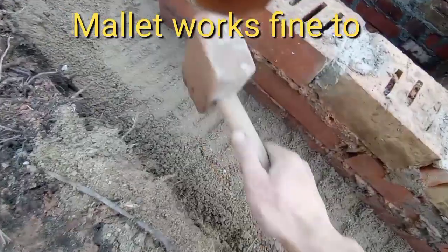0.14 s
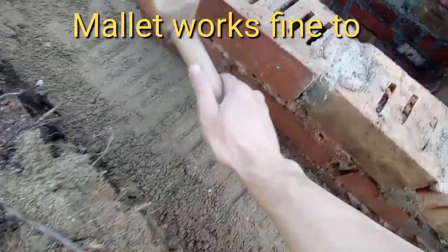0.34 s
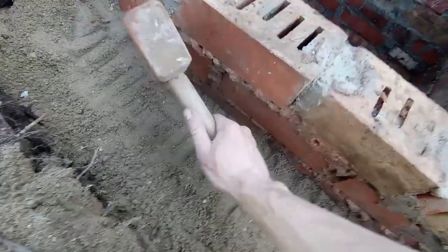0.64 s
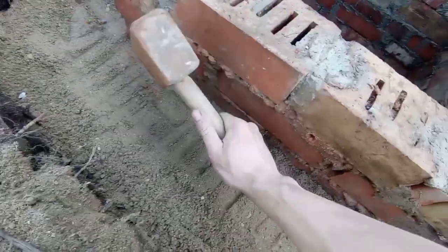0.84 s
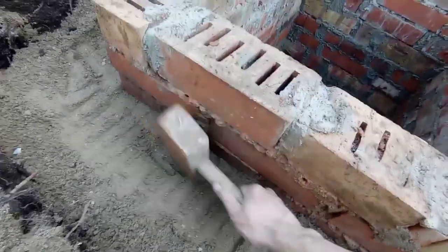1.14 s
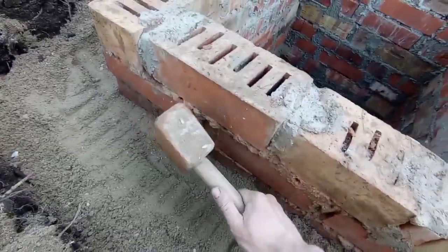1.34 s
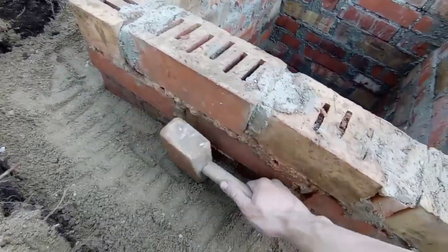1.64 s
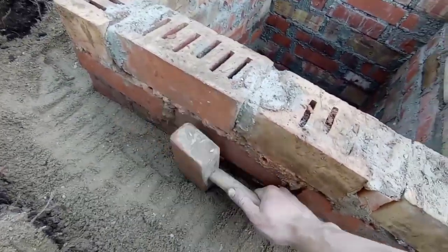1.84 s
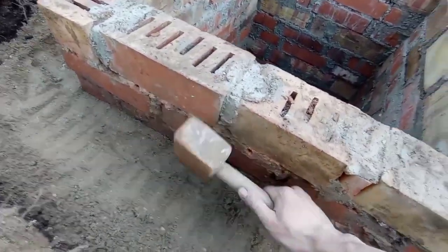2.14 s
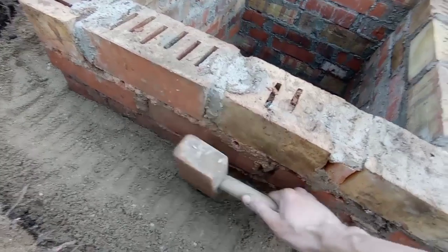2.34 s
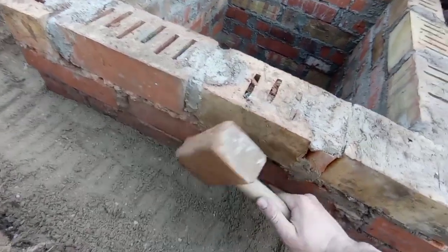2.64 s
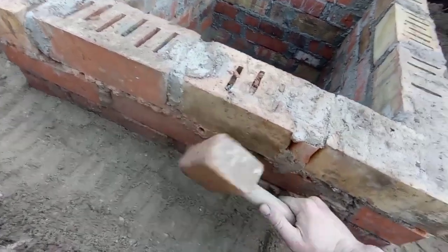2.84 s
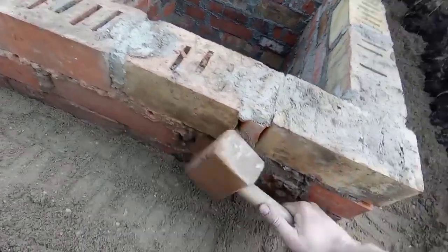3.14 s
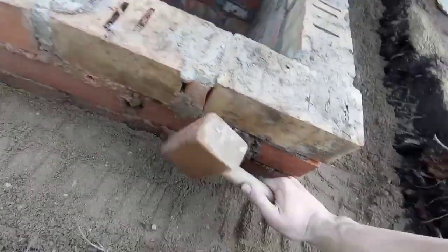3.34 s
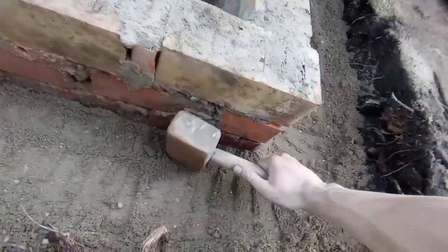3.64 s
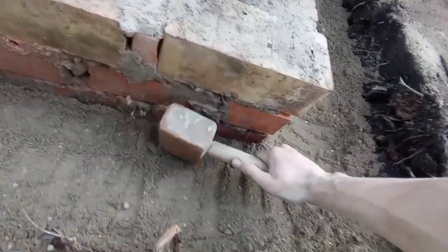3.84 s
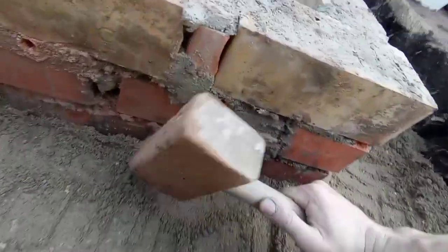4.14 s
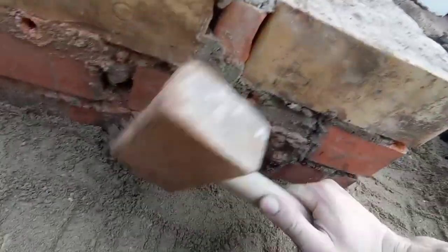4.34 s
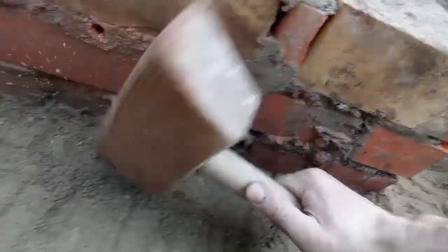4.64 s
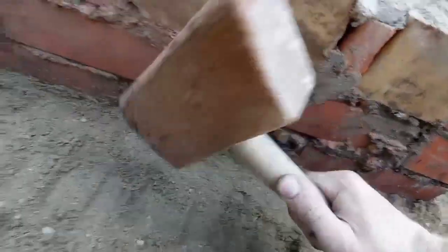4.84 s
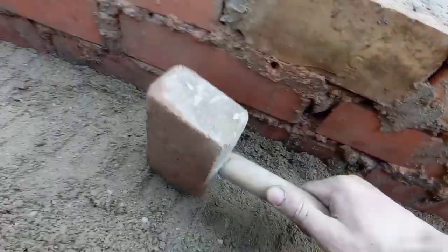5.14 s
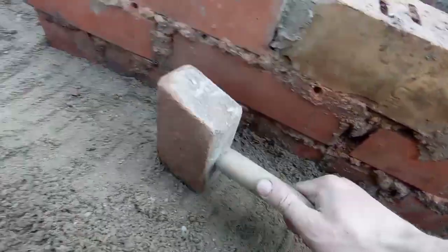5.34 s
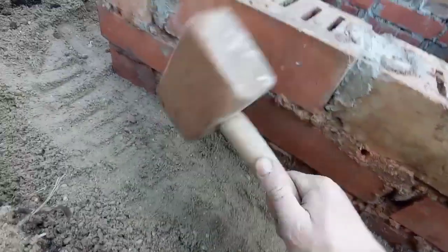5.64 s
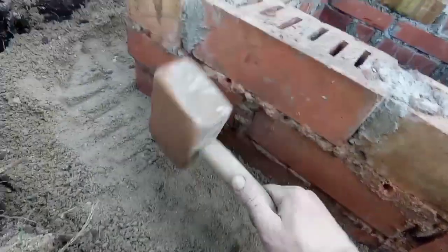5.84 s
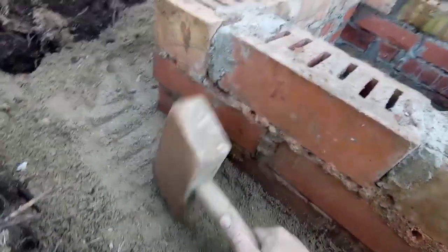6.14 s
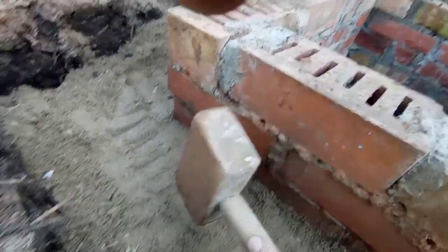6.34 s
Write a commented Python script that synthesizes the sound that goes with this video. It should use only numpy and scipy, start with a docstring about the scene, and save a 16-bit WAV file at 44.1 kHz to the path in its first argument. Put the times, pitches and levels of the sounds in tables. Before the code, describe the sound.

Close, dry recording outdoors beside low brickwork: a mallet rapidly tamps packed sand, thudding and slapping evenly. Sand patters between blows and hard little knocks come off brick. Halfway the hits fade to light taps and gritty scraping, then dull thuds rebuild and end crisp and strong. Faint buzzy bird whistles sit far behind, over low air noise.

```python
"""At the foot of a brick wall, outdoors: a mallet close to the microphone tamps damp sand, four to five blows
a second. Each blow is a crunch of noisy grains, a slap pulse, a ringing clack and a sinking thud; brief
knocks and ticks fall between. Shaped grain noise makes the falling sand, the scrapes and the cloth. Short
echoes come off the walls; far away, swept tones call as small birds over a bed of quiet air noise."""
import sys
import numpy as np
from scipy import signal
from scipy.fft import rfft, irfft, next_fast_len
from scipy.io import wavfile
from scipy.ndimage import map_coordinates

SR = 44100
rng = np.random.default_rng(int(sys.argv[2]) if len(sys.argv) > 2 else 0)


def generate_wav(signal):
    """Clip the signal to [-1, 1] and save it as 16-bit WAV at the path in sys.argv[1]."""
    frames = np.transpose(np.atleast_2d(signal))
    scaled = np.clip(frames, -1, 1) * 32767
    pcm = np.round(scaled).astype(np.int16)
    wavfile.write(sys.argv[1], SR, pcm)


N = 286031
TIME = np.arange(N) / SR

# Levels in the tables are relative within their own column or layer.
# Blows on the sand, close by: (time [s], thud level [dB], settled thud pitch [Hz], slap level [dB],
# clack level [dB], crunch level [dB])
BLOWS = [(0.690, -8, 144.7, -10.5, -45, -32.5), (0.920, -1.5, 146, -7, -18, -29.5),
         (1.1442, -10, 127.5, -13.5, -37, -29), (1.3769, -10.5, 126, -14.5, -19, -29.5),
         (1.604, -10, 134.2, -8, -14.5, -27), (1.8223, -12.5, 131, -15.5, -58, -26),
         (2.053, -13, 129, -13.5, -26, -26), (2.279, -13, 122.5, -18, -33.5, -29),
         (2.5064, -8.7, 136.3, -15, -27.5, -28.5), (2.7203, -11, 130, -13.5, -27.5, -29),
         (2.941, -5, 142.8, -17.5, -30.5, -28.5), (3.17, -16, 123, -26, -49.5, -32.5),
         (3.403, -28, 120, -54, -42, -31), (3.6076, -27.5, 133, -38, -18, -41.5),
         (3.826, -24, 120, -30.5, -55.5, -35.5), (4.033, -16, 143.6, -61, -42, -41.5),
         (4.233, -20, 126, -30, -56, -34.5), (4.4564, -14, 128, -17.5, -33.5, -31.5),
         (4.675, -7.5, 142, -25.5, -53, -33.5), (4.8926, -7.3, 138.3, -29, -37, -30.5),
         (5.116, -10.5, 133.6, -45, -45, -35), (5.33, -8.5, 137.5, -22.5, -26.5, -30),
         (5.547, -14.5, 130, -47, -35, -35.5), (5.7624, -6.5, 146, -28.5, -31.5, -33),
         (5.988, -8.5, 132.5, -31, -20, -32.5), (6.195, -3.5, 152.4, -7.5, -24.5, -28),
         (6.39, -4.5, 147.7, -13.5, -12, -31.5)]
# Firmly packed sand thuds higher and shorter than loose sand: (thud pitch [Hz], decay by 60 dB [s])
PACKING = [(127, 0.061), (148, .027)]
# Ringing modes of the mallet head: (frequency [Hz], level [dB], decay by 60 dB [s])
HEAD_MODES = [(520, -2, .015), (660, -2, .015), (1450, -13, .01)]
# Brief knocks and ticks: brick contacts, light taps just before a blow, small handling ticks:
# (time [s], knock level [dB], tick level [dB])
KNOCKS = [(0.071, -38, -58), (0.307, -37, -75), (0.572, -64.5, -52), (1.796, -47.5, -78),
          (2.463, -49, -41.5), (2.476, -32, -25), (2.489, -37, -32), (2.501, -15.5, -21.5),
          (2.716, -27.5, -23), (3.036, -70, -49.5), (3.045, -41, -67), (3.375, -51.5, -43.5),
          (3.382, -35.5, -22.5), (3.604, -22, -27), (3.685, -67, -42), (3.817, -37.5, -33.5),
          (3.922, -77.5, -49), (4.027, -34, -31), (6.143, -39.5, -58)]
# Resonances of the mortared bricks: (frequency [Hz], width [Hz], level [dB])
BRICK_MODES = [(391, 91, 5), (664, 190, 4), (758, 210, 3), (1084, 310, -4.5), (1248, 390, -7.5),
               (2400, 700, -20)]
# Sand drops from the lifted head between blows: (time [s], level [dB])
SPILLS = [(1.729, -39), (2.181, -55.5), (2.393, -34), (2.628, -37.5), (2.840, -39), (3.067, -33.5),
          (3.292, -32), (3.53, -38), (3.74, -35.5), (6.144, -49)]
# Sand scraping underfoot and under the head: (time of the height [s], rise [s], fall [s],
# hiss level [dB], dull rub level [dB])
SCRAPES = [(0.11, 0.097, 0.19, -66.5, -66), (0.565, 0.089, .07, -66.5, -88), (0.899, .01, 0.012, -65, -80),
           (1.15, 0.052, .058, -59.5, -72), (3.64, 0.23, 0.19, -65, -66), (3.98, 0.027, 0.027, -40, -50),
           (4.077, 0.039, 0.031, -41, -48.5), (4.161, 0.03, 0.069, -33, -44.5),
           (4.388, 0.055, 0.039, -47.5, -52.5), (4.54, 0.12, 0.11, -65, -65.5),
           (4.733, 0.051, 0.062, -67, -46), (4.952, 0.059, 0.049, -72, -59), (6.229, .06, 0.08, -53.5, -56),
           (6.33, 0.054, .053, -36, -53.5), (6.455, .036, .036, -42, -60.5)]
# Clothing as the arm lifts, level curve: (time [s], level [dB])
RUSTLE = [(0.043, -94), (0.076, -50.5), (0.11, -60.5), (0.2, -63), (0.3, -64.5), (0.45, -72.5)]
# Colour of crushed, falling and ticking grains: (frequency [Hz], relative density [dB per Hz])
GRIT_COLOUR = [(300, 7.5), (900, -2.5), (2000, -2), (3500, -3), (5500, -3.5), (7200, 2), (8500, -11),
               (11000, -17.5), (13700, -24.5), (15200, -9), (16500, -38.5)]
# Colour of loose grains hissing as they slide: (frequency [Hz], relative density [dB per Hz])
HISS_COLOUR = [(200, -17), (700, -25), (1500, -5), (3000, -3), (4200, -1.5), (5600, 2.5), (7200, 0.5),
               (8500, -11), (11000, -20), (13500, -24.5), (15100, -13), (16200, -15.5)]
# Colour of packed sand rubbing: (frequency [Hz], relative density [dB per Hz])
RUB_COLOUR = [(120, -7.5), (300, 1.5), (600, 3.5), (1200, 0.5), (2600, -6.5), (4000, -11.5), (8000, -22),
              (16000, -39)]
# Colour of the cloth: (frequency [Hz], relative density [dB per Hz])
CLOTH_COLOUR = [(300, 2), (1500, -8), (2200, 6.5), (3600, 7.5), (4800, -4), (9000, -7.5), (12000, -33)]
# Echo of the yard: (frequency [Hz], decay by 60 dB [s])
YARD_DECAY = [(60, 0.83), (150, 0.14), (500, 0.25), (1500, 0.15), (5000, 0.057), (12000, 0.18)]
# Starting colour of the yard echo: (frequency [Hz], relative level [dB])
YARD_COLOUR = [(50, -2.5), (150, -3), (300, 5), (600, -7.5), (1000, -5), (2000, -9), (10000, -10)]
# Far, drawn-out buzzy bird notes, each one arch of pitch: (start [s], length [s], first pitch [Hz],
# middle pitch [Hz], last pitch [Hz], trill depth [Hz], level [dB])
WHEEZES = [(4.53, 1.02, 2923, 3916, 3923, 353, -50.5), (4.885, 0.61, 4500, 5015, 4490, 255, -52.5),
           (5.094, 0.71, 3040, 3023, 2910, 130, -64.5), (5.682, 0.13, 6280, 6540, 6630, 200, -53.5),
           (5.759, .19, 6380, 5830, 5730, 200, -55), (5.866, 0.31, 3410, 3620, 4040, 380, -60),
           (6.009, .11, 4200, 5450, 6180, 403, -54.5)]
# Far, short falling chirps: (time [s], level [dB])
CHIPS = [(0.13, -52), (0.2, -51.5), (0.274, -53.5), (0.365, -52.5)]
# Echo among the trees: (frequency [Hz], decay by 60 dB [s])
TREE_DECAY = [(3000, 1), (7000, 0.21)]
# Colour of the outdoor air: (frequency [Hz], relative density [dB per Hz])
AIR_COLOUR = [(18, -42.5), (30, -2.5), (109, 7.5), (210, -9.5), (245, -27), (540, -7), (600, -7),
              (1540, -28), (2980, -45.5), (5740, -53.5), (6380, -38.5), (10500, -44.5), (16000, -56.5)]
# Colour of the far treble haze: (frequency [Hz], relative density [dB per Hz])
HAZE_COLOUR = [(1500, -17), (2300, -3), (3200, -1), (4500, -8), (6000, -7), (7500, -10.5), (10000, -32)]


def blows(crunch_width=.0013, soft_stretch=0.13, crunch_db=10.5, settle_db=-15, settle_t60=0.039,
          trickle_db=-32, trickle_t60=0.11, clack_db=-2, low_ring_db=-31, low_ring_hz=60, low_ring_t60=0.12,
          low_ring_rise=0.01, slap_hz=400, lead_s=.0012, lead_growth=0.75, usual_db=-5.5):
    """Grains crunch while the head sinks in, then it stops with a slap, a dry clack and a thud."""
    body, pressure = np.zeros(N), np.zeros(N)
    t = np.arange(-SR // 50, SR // 3) / SR  # 0 is the moment the head stops
    after = np.maximum(t, 0)
    hardest_db = max(row[3] for row in BLOWS)
    # a low, short ring near 60 Hz, alike under every blow
    low_level = amp(low_ring_db - 60 * after / low_ring_t60) * (1 - np.exp(-after / low_ring_rise))
    low_ring = low_level * np.sin(2 * np.pi * low_ring_hz * after)
    # disturbed grains settle fast, then trickle
    settle = amp(settle_db - 60 * after / settle_t60) + amp(trickle_db - 60 * after / trickle_t60)
    settle = settle * (t > 0)
    for s, thud_db, thud_hz, slap_db, head_db, grit_db in BLOWS:
        stop = amp(thud_db) * thud(t, thud_hz, along(PACKING, thud_hz))
        stop = stop + amp(slap_db) * slap(t, slap_hz)
        add(body, s + t[0], stop + amp(head_db + clack_db) * clack(t) + low_ring)
        # the crunch starts before the stop, and earlier for a thud weaker than the usual one
        lead = lead_s * amp(lead_growth * (usual_db - thud_db))
        # a softer slap goes with a longer sinking in
        width = crunch_width * amp(soft_stretch * (hardest_db - slap_db))
        crush = amp(crunch_db) * np.exp(-np.hypot(1, (t + lead) / width * 1.24))
        add(pressure, s + t[0], amp(grit_db) * (crush + settle))
    return body + pressure * grains(GRIT_COLOUR, rate=16000, spread_db=2)


def thud(t, hz, t60, stiffening=0.45, relax=0.003, contact=0.0022):
    """The ground springs back under the head; the pitch sinks as the load eases."""
    cycles = hz * (t + stiffening * relax * (1 - np.exp(-t / relax)))
    onset = (1 + np.tanh(t / contact)) / 2
    return amp(-60 * np.maximum(t, 0) / t60) * np.cos(2 * np.pi * cycles) * onset


def slap(t, hz, softness=0.14):
    """Air squeezed from under the flat face: one sharp pressure peak between two dips."""
    u = 2 * np.pi * hz * t
    return np.gradient(u * np.exp(-np.hypot(u, softness)), u)


def clack(t, contact=0.0016):
    """The head rings for a few cycles, a little differently at each landing."""
    ring = np.zeros(len(t))
    for hz, db, t60 in HEAD_MODES:
        detuned_hz = hz * rng.normal(1, .06)
        level = amp(db + rng.normal(0, 0.53) - 60 * np.maximum(t, 0) / t60)
        ring += level * np.sin(2 * np.pi * detuned_hz * t)
    return ring * (1 + np.tanh(t / contact + 1)) / 2


def brick_response(hz):
    """Parallel resonances of the mortared bricks, alternating in sign."""
    total = 0
    for k, (centre, width, db) in enumerate(BRICK_MODES):
        loss = 1j * hz * width
        total = total + (-1) ** k * amp(db) * loss / (centre ** 2 - hz ** 2 + loss)
    return total


def knocks(tick_t60=0.023, chatter_t60=0.015, hollow_db=-22, hollow_t60=0.24):
    """Rough, brief noise rings the brick resonances, with a faint hollow tail; grain noise makes the ticks."""
    out, ticks = np.zeros(N), np.zeros(N)
    t = np.arange(SR // 4) / SR
    drive = amp(-60 * t / chatter_t60) + amp(hollow_db - 60 * t / hollow_t60)
    for s, knock_db, tick_db in KNOCKS:
        ring = filtered(rng.standard_normal(len(t)) * drive, brick_response)
        add(out, s, amp(knock_db) * ring / np.abs(ring).max())
        add(ticks, s, amp(tick_db - 60 * t / tick_t60))
    return out + ticks * grains(GRIT_COLOUR, rate=11000, spread_db=0)


def spills(trim_db=-12, rise=0.00028, t60=0.12):
    """Pinches of sand patter down between the blows: grain noise that starts at once and dies away."""
    flow, t = np.zeros(N), np.arange(SR // 5) / SR
    for s, db in SPILLS:
        add(flow, s, amp(db + trim_db - 60 * t / t60) * (1 - np.exp(-t / rise)))
    return flow * grains(GRIT_COLOUR, rate=5000, spread_db=3.5)


def scrapes(judder_db=1.35, skip_db=-42):
    """Loose grains hiss as they slide and a few skip away, ticking; packed sand under them rubs more dully."""
    hiss, rub = np.zeros(N), np.zeros(N)
    for s, rise, fall, hiss_db, rub_db in SCRAPES:
        span = np.where(TIME < s, rise, fall)
        stroke = np.exp(-np.minimum(((TIME - s) / span) ** 2, 20))
        hiss += amp(hiss_db) * stroke
        rub += amp(rub_db) * stroke
    loose = grains(HISS_COLOUR, rate=16000, spread_db=3)
    packed = grains(RUB_COLOUR, rate=4000, spread_db=3.5)
    skipping = grains(GRIT_COLOUR, rate=80, spread_db=4)
    sliding = amp(judder_db * wobble(90)) * (hiss * loose + rub * packed)
    return sliding + amp(skip_db) * np.sqrt(hiss) * skipping


def rustle():
    """Clothing rustles as the mallet is first raised: fine cloth-coloured clicks under a level curve."""
    s, db = np.transpose(RUSTLE)
    level = np.interp(TIME, s, amp(db), left=0, right=0)
    return level * grains(CLOTH_COLOUR, rate=4000, spread_db=3)


def near_wall(x, wall_db=-17, path=.004):
    """The brickwork throws back a quick reflection whose delay [s] wanders slowly and at random."""
    delay = path * (1 + .25 * wobble(2))
    return amp(wall_db) * np.interp(TIME - delay, TIME, x)


def yard(x, wet_db=-29, delay=0.0097, count=13):
    """Faint wall echoes, crossfading evenly between random diffuse tails, so that the echo varies over time."""
    knots = np.linspace(0, TIME[-1], count)
    echo = np.zeros(N)
    for share in np.eye(count):
        stretch = x * np.interp(TIME, knots, share)
        add(echo, delay, signal.oaconvolve(stretch, tail(YARD_DECAY, YARD_COLOUR)))
    return amp(wet_db) * echo


def birds(trill_hz=140, chip_hz=3800, chip_fall_hz=1000, chip_length=0.0215, wet_db=-4, level_db=-1):
    """Far whistles swept by a fast, uneven trill and blurred by the trees, and plain falling chirps."""
    attack, release, fade_db = 0.22, 0.077, 11  # shares of a note's length; level lost along the note
    song = np.zeros(N)
    for s, length, first_hz, middle_hz, last_hz, depth_hz, db in WHEEZES:
        u = np.clip((TIME - s) / length, 0, 1)
        arch = np.polyval(np.polyfit([0, .5, 1], [first_hz, middle_hz, last_hz], 2), u)
        swell = np.minimum(1, np.minimum(u / attack, (1 - u) / release)) ** 2
        trill_rate = trill_hz * (1 + 0.22 * wobble(60))
        trill = np.sin(2 * np.pi * np.cumsum(trill_rate) / SR)
        pitch = arch + depth_hz * (trill + 0.1204 * wobble(500))
        song += amp(db - fade_db * u) * swell * np.sin(2 * np.pi * np.cumsum(pitch) / SR)
    # only the whistles reach the trees' echo
    far = signal.fftconvolve(song, tail(TREE_DECAY, [(3000, 0)]))[:N]
    u = np.linspace(0, 1, int(chip_length * SR))
    chip = np.sin(np.pi * u) * np.sin(2 * np.pi * np.cumsum(chip_hz - chip_fall_hz * u) / SR)
    for s, db in CHIPS:
        add(song, s, amp(db) * chip)
    return amp(level_db) * (song + amp(wet_db) * far)


def air(level_db=-65, haze_db=-77):
    """Quiet outdoor background noise, with a faint, shifting haze in the treble."""
    murk = patchy(coloured(rng.standard_normal(N), AIR_COLOUR), depth_db=2.5, width_hz=250, span=.1)
    haze = patchy(coloured(rng.standard_normal(N), HAZE_COLOUR), depth_db=3.5, width_hz=400, span=.13)
    return amp(level_db) * murk + amp(haze_db) * haze


def grains(spectrum, rate, spread_db):
    """Grain noise at rms 1: random micro-clicks of either sign and uneven size, rate a second, coloured."""
    clicks = (rng.random(N) < rate / SR) * np.sign(rng.standard_normal(N))
    return coloured(clicks * amp(spread_db * rng.standard_normal(N)), spectrum)


def tail(t60s, tone):
    """A diffuse echo of energy 1 in which each frequency dies at its own speed."""
    hz, t, z = signal.stft(rng.standard_normal(SR // 2), SR, nperseg=512)
    gain = amp(along(tone, hz)[:, None] - 60 * t / along(t60s, hz)[:, None])
    echo = signal.istft(z * gain, SR, nperseg=512)[1]
    return echo / np.linalg.norm(echo)


def patchy(x, depth_db, width_hz, span):
    """Let patches of the spectrum, about width_hz by span seconds, swell and fade independently."""
    hz, t, z = signal.stft(x, SR, nperseg=512)
    grid = np.meshgrid(hz / width_hz, t / span, indexing="ij")
    field = map_coordinates(rng.standard_normal((256, 512)), grid, mode="grid-wrap")
    return unit(signal.istft(z * amp(depth_db * field), SR, nperseg=512)[1][:N])


def wobble(rate):
    """A smooth random curve, rate knots a second."""
    return map_coordinates(rng.standard_normal(int(N * rate / SR) + 4), [TIME * rate])


def coloured(x, spectrum):
    """Shape x by a spectrum, at rms 1."""
    return unit(filtered(x, lambda hz: amp(along(spectrum, hz))))


def filtered(x, response):
    """Multiply the spectrum of x by a response of frequency."""
    m = next_fast_len(len(x) + 8192)  # padded, so that the end does not wrap onto the start
    return irfft(rfft(x, m) * response(np.fft.rfftfreq(m, 1 / SR)), m)[:len(x)]


def along(points, hz):
    """Read (frequency [Hz], value) points on a log frequency axis."""
    f, v = np.transpose(points)
    return np.interp(np.log(hz + 1), np.log(f), v)


def add(track, s, sound):
    """Mix a sound into the track from time s."""
    i = max(round(s * SR), 0)
    track[i:i + len(sound)] += sound[:N - i]


def unit(x):
    """Scale to rms 1."""
    return x / np.sqrt(np.mean(x ** 2) + 1e-20)


def amp(db):
    """Decibels to gain."""
    return 10 ** (np.asarray(db) / 20)


def scene():
    """The work close by, its reflections off the walls, far birds and the air."""
    work = blows() + knocks() + spills() + scrapes() + rustle()
    return (work + near_wall(work) + yard(work) + birds() + air())[None]


def record(dry, low_hz=46, top_hz=16000):
    """The microphone sheds the deepest bass and everything above its band limit."""
    bass_cut = signal.butter(4, low_hz, "high", fs=SR, output="sos")
    thinned = signal.sosfilt(bass_cut, dry[0])
    return filtered(thinned, lambda hz: hz < top_hz)[None]


dry = scene()
out = record(dry)
generate_wav(out)
```